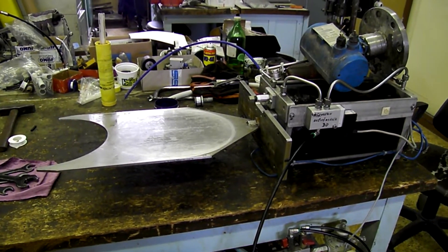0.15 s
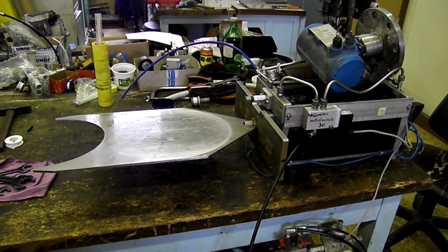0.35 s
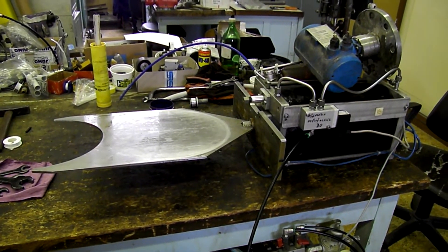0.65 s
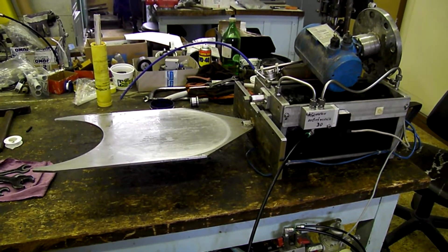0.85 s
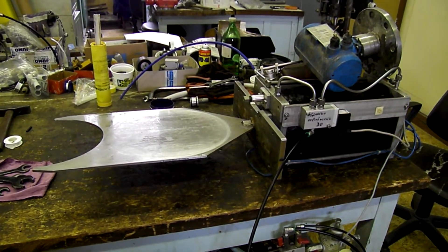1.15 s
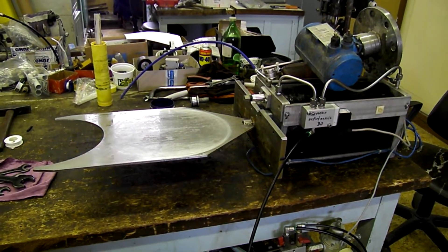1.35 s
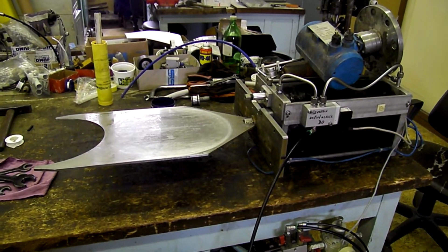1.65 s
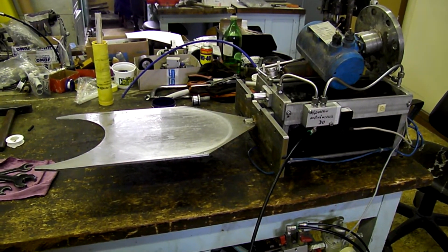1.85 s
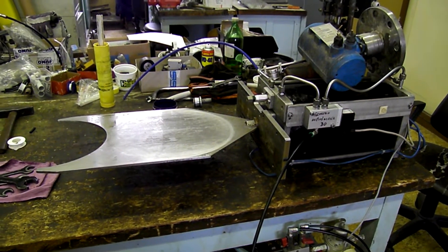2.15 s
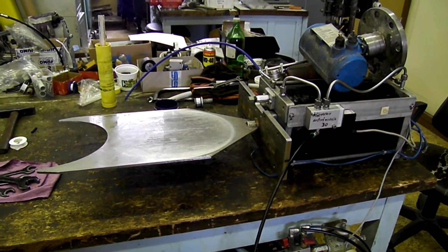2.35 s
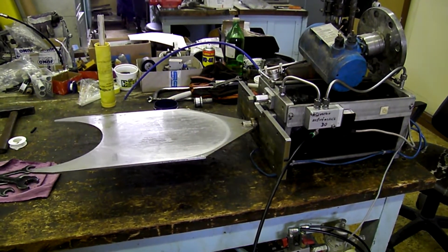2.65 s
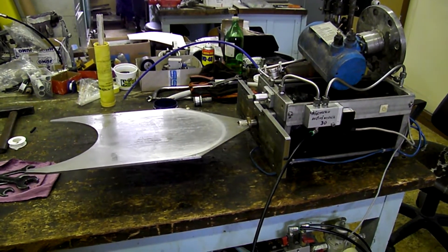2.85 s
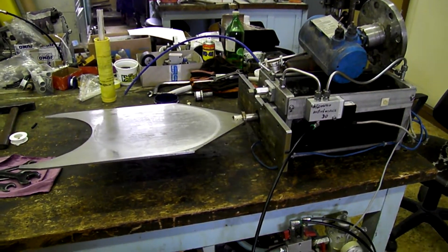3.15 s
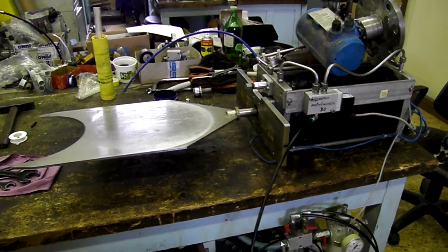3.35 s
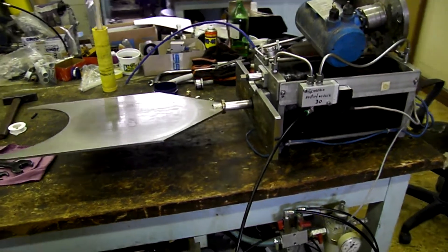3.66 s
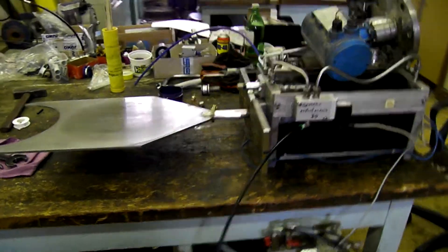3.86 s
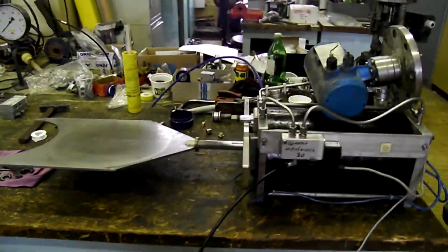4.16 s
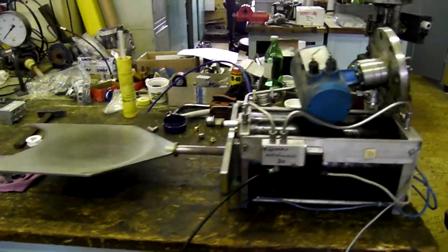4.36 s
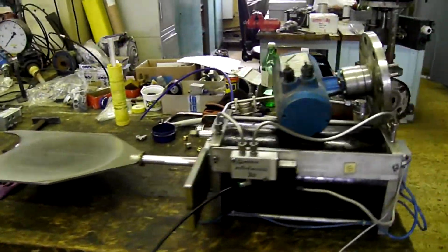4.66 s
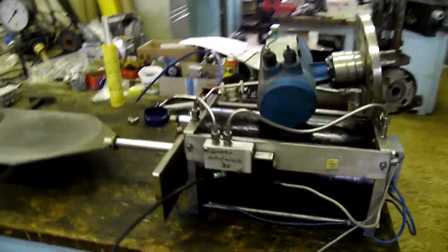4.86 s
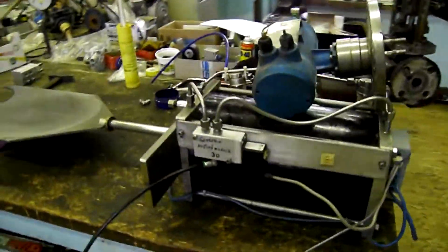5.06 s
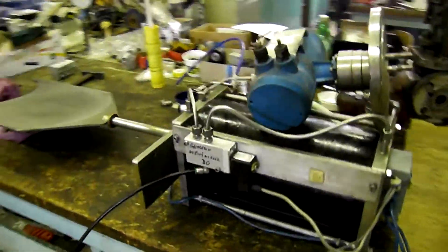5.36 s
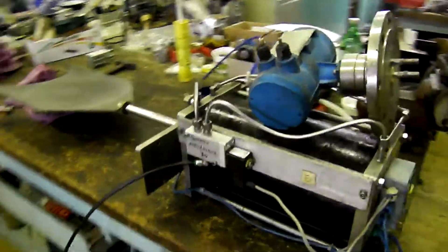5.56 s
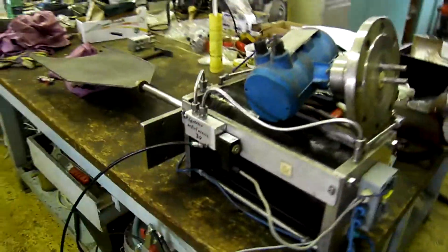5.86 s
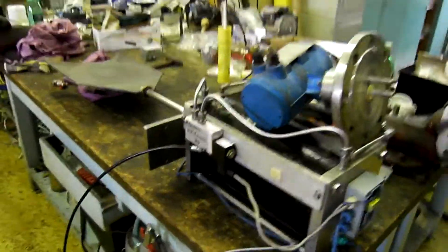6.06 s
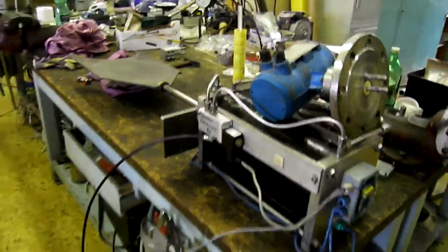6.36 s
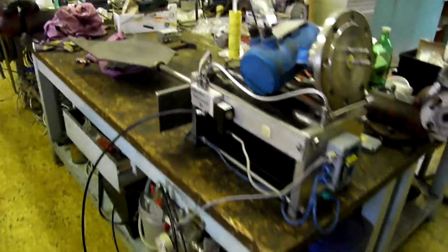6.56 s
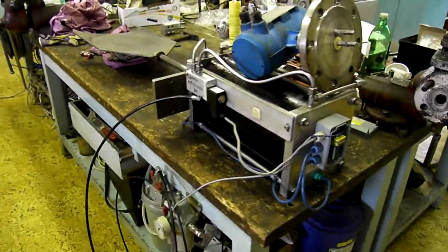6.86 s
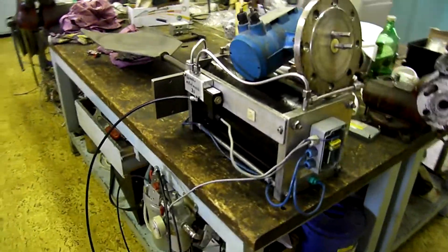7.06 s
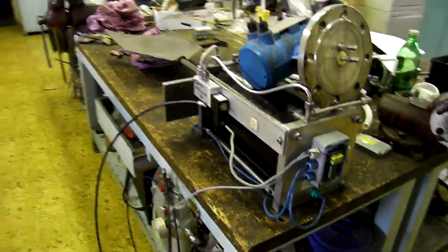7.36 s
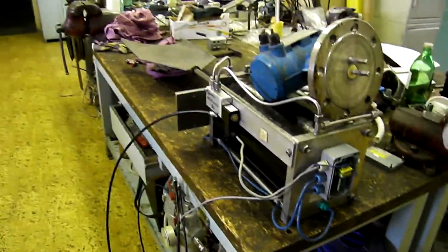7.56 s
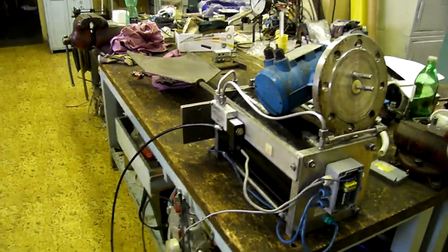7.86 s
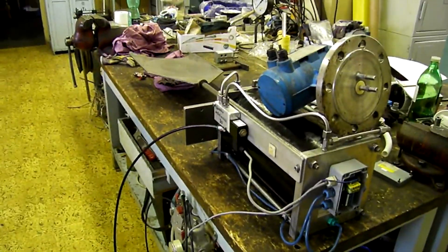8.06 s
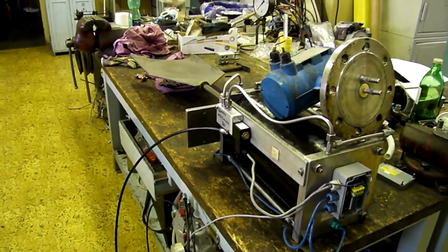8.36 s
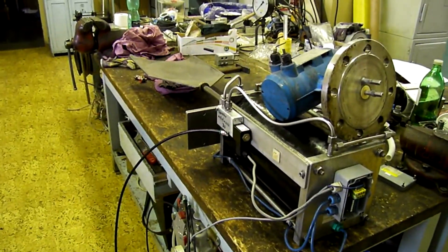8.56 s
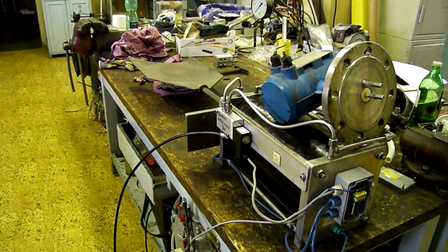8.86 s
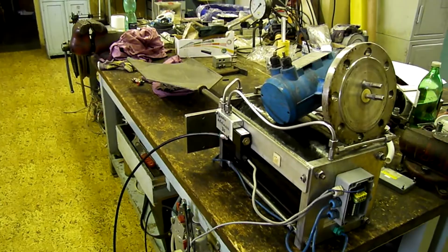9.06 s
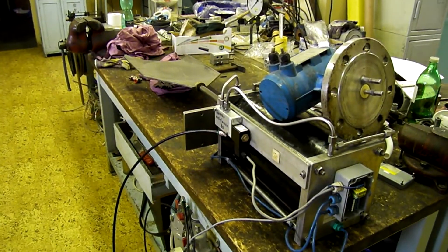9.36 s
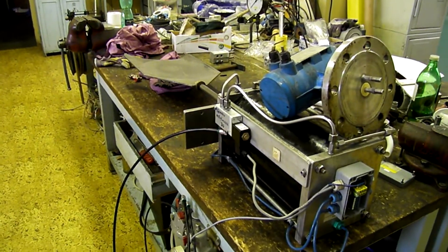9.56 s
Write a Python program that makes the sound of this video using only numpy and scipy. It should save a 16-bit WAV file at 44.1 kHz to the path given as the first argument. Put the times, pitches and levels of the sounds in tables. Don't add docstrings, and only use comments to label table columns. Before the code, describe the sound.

In a workshop, a slow air leak hisses softly with faint hollow tones over muffled rumble. After two seconds a brief puff and a hard valve clack release a loud, bright, steady air jet for about four seconds, its colour shifting as the handheld microphone moves round the rig. The exhaust then sighs down with airy, overlapping whistles, the rumble swells back, and two tiny ticks finish.

```python
import sys
import numpy as np
from scipy import signal
from scipy.fft import rfft, irfft
from scipy.io import wavfile
from scipy.ndimage import uniform_filter1d

SR = 44100
rng = np.random.default_rng(int(sys.argv[2]) if len(sys.argv) > 2 else 0)


def generate_wav(signal):
    frames = np.transpose(np.atleast_2d(signal))
    scaled = np.clip(frames, -1, 1) * 32767
    pcm = np.round(scaled).astype(np.int16)
    wavfile.write(sys.argv[1], SR, pcm)


def rack_gain(trim_db):
    fader = np.asarray(trim_db, float)
    return 10 ** (fader / 20)


N = 428652
SIZE, HOP = 1024, 256
T = np.arange(N // HOP + 5) * HOP / SR
HZ = np.fft.rfftfreq(SIZE, 1 / SR)[:, None]

# time in seconds, level in dB.
VENT_FLOW = [
    [(0.0, -24), (0.3, -25.5), (0.6, -28.5), (2.008, -29)],
    [(2.013, -30), (2.018, -24), (2.023, -23), (2.029, -16.5), (2.25, -27)],
    [(6.17, -20), (6.29, -15.5), (6.49, -15), (6.87, -19), (7.15, -19), (7.71, -22), (8.4, -24.5),
     (9.1, -26), (9.72, -25)],
]
# frequency in Hz, density in dB per Hz.
VENT_COLOUR = [(710, -56.5), (1200, -17), (1850, -6), (2100, -9), (2290, -7), (2440, -8.5), (5470, -10.5),
               (7160, -16), (7720, -18), (8970, -23), (15700, -37)]
# start in seconds, fade in seconds,
# lift of the rush in Hz, lift of the rush in dB, lift of the treble in dB.
OPENINGS = [
    (2.015, 0.15, 100, -3, 11.5),
    (6.17, 0.43, 2400, 3.5, 8.5),
]
# centre in
# seconds, length in seconds, level in dB, treble in dB.
SPURTS = [(.06, .05, -0.5, 3), (.33, .05, 0, 3), (.48, .05, -1.5, -1), (.57, 0.026, 1.5, 3),
          (.69, .05, 3, 3), (.86, 0.11, 1.4, 2), (1.15, 0.11, -0.2, 4), (1.81, 0.079, 1.5, 5),
          (6.5, .13, 0.4, -11), (7.05, 0.35, 0, 3), (8.72, .16, 2, -8), (9.43, 0.12, 3, -2.5)]
RUSH_HZ, RUSH_DB, VENT_TREBLE_DB = 2450, 6, -16.5

# frequency in Hz, density in dB per Hz.
SHOP_COLOUR = [(15, -30), (25, -29), (59, -28), (104, -27), (156, -16), (202, -13), (275, -5.5), (356, -5),
               (415, -8.5), (756, -4), (1100, -7), (1500, -9.5), (1950, -14), (2900, -22), (4300, -80)]
# time in seconds, level in dB.
SHOP_GAIN = [(0.0, -34), (1.04, -32.5), (2.23, -33), (2.3, -46), (2.6, -54.5), (6.16, -59.5), (6.28, -42.5),
             (6.67, -29), (7.3, -25.5), (8.4, -28), (9.72, -24.5)]
# centre in seconds, length in seconds, level in dB,
# upper part in dB, bass in dB.
ROLLS = [(.27, 0.053, 1, -1, .1), (1.12, 0.11, 1.5, -1, 1), (1.78, .05, -1, 3, 1), (6.26, .05, 3, -2, 12),
         (7.08, 0.16, 0.5, 2.5, -1), (8.74, 0.16, 7.5, -2, -4), (9.0, 0.42, 1.1, -3.5, 1.2),
         (9.41, 0.15, 5.5, -1, 1)]
# time in seconds, level in dB per band.
MICROPHONE_HISS = [(0, -89), (6.55, -88), (6.8, -69.5), (9.72, -71)]
SHOP_BASS_DB, SHOP_UPPER_DB = -7, 0.4

# loudest
# moment in seconds, pitch in Hz, level in dB, length in seconds.
TUBE_TONES = [(0.151, 1838, -33, 0.31), (.18, 370, -37.5, .25), (.2, 2470, -41.5, .2),
              (.3, 3080, -39.5, .4), (1.599, 591, -43, .3), (.3, 3730, -45, .2), (.3, 2780, -45, .2),
              (.4, 330, -44.5, .25), (.43, 2393, -40.5, .23), (.65, 1864, -42, .25),
              (1.25, 588, -39, .35), (7.9, 7600, -44, .3), (9.4, 305.5, -33, .2),
              (1.891, 371, -38.5, .26), (2.089, 1930, -30, .06), (7.5, 166.8, -44, 0.92),
              (8.01, 767, -35, 0.19), (9.392, 602, -30, .18),
              (6.697, 2345, -29.5, .22), (6.74, 1885, -27.5, .28), (6.84, 3645, -30.5, .22),
                 (6.751, 2900, -28, .2), (6.851, 1730, -34, .35), (6.877, 7020, -38, .28),
                 (6.906, 13420, -44, .14), (6.93, 4456, -41, .2), (7.0, 4860, -35, .3),
                 (6.95, 2010, -34, .3), (7.3, 7250, -41, .25), (6.938, 2180, -32, .21),
                 (6.949, 3045, -30.5, .2), (7.06, 12590, -52, .22), (7.05, 2439, -32, .34),
                 (7.162, 3211, -35.5, .2), (7.3, 7800, -42, .6), (7.301, 1900, -31, .35),
                 (7.42, 2375, -30, .55), (7.47, 4400, -35, .37), (7.5, 3200, -39, .3),
                 (7.62, 4000, -38, .3), (7.599, 5019, -32, .3), (7.803, 2100, -36.5, .45),
                 (8.15, 4374, -38.5, .44), (8.218, 7378, -47, .16), (8.198, 3747, -38.5, .42),
                 (8.4, 3100, -42.5, .35), (8.38, 4774, -44, .28), (8.603, 4554, -43, .4)]
WIDTH_HZ, WIDTH_PER_HZ, WIDTH_TIMES_S = 7, .0018, 2.2
WARMING = .012

# start in seconds, burst in dB, ring in dB, ring in Hz,
# decay time (T60) of the ring in seconds.
VALVE_BLOWS = [
    (.7103, -25, -17, 2000, .035),
    (2.0178, -40, -26, 1900, .04),
    (2.2385, -12, -11, 350, .02),
    (2.2573, 5, -2, 800, .012),
    (9.6794, -27, -17, 4300, .03),
    (9.7172, -14, -12, 4400, .03),
]
# frequency in Hz, density in dB per Hz.
BLOW_COLOUR = [(240, -47), (400, -21), (2040, 0), (3490, 4), (4060, 0), (5120, 5), (6250, 2), (13900, -3.5),
               (15700, -28)]
BURST_T60, T60_PER_DB = .045, .0008

# time in seconds, level in dB, presence near 5 kHz in dB, treble in dB.
JET_FLOW = [
    [(2.24, -16, -3, -2), (2.253, -18, -3, 0.1)],
    [(2.27, -14, 0.5, -0.5), (2.55, -15.5, 2.5, -1), (4.32, -14, -0.5, -4.5), (6.08, -16, 0, -1),
     (6.17, -17, 0.1, -2.5)],
]
# frequency in Hz, density in dB per Hz.
JET_COLOUR = [(15, -82), (25, -41.5), (315, -42), (570, -23), (618, -23.5), (788, -17.5), (901, -21.5),
              (1250, -12.5), (1460, -12), (2250, -7), (4190, -3.5), (9410, -6), (14100, -5.5),
              (15700, -9.5)]
JET_TAIL_T60 = 1
# time in seconds, stretch of the plate path
WALK_LARGE = [(2.3, -0.0, -0.0, 0.25), (3.4, -8.5, -13.5, 0.11), (3.9, 0.3, 4.4, 0.34),
              (4.4, 14.5, 2.9, 0.76), (4.8, 12.0, 5.4, 0.84), (5.2, 16.0, 5.2, 0.91),
              (5.55, 16.4, -2.4, 0.81), (5.85, 8.3, -8.2, 1.0), (6.15, 0.0, -13.5, 0.97)]
# time in seconds, stretch of the frame path in %,
# stretch of the housing path in %, turn from 0 to 1.
WALK_SMALL = [(2.3, -0.0, -0.0, 0.03), (3.4, -5.0, 0.1, 0.16), (3.9, 11.3, 3.9, 0.25),
              (4.4, 15.5, 9.8, 0.24), (4.8, 12.4, 11.6, 0.2), (5.2, 15.6, 14.8, 0.43),
              (5.55, 10.1, 19.0, 0.98), (5.85, 6.2, 17.0, 0.77), (6.15, 7.1, 8.0, 0.44)]
# delay in ms, one crest in Hz, share of the first path,
# ripple in dB before the turn, ripple in dB after it.
LONG_ECHOES = [(0.39, 5310.0, 0.86, 0.75, 1.88), (0.513, 4070.0, -0.99, 0.93, -1.64),
               (0.25, 3740.0, 0.18, 1.47, -2.5), (0.763, 4310.0, 0.28, 0.06, -1.61)]
# delay in ms, one crest in Hz, share of the first path,
# ripple in dB before the turn, ripple in dB after it.
SHORT_ECHOES = [(0.321, 11520.0, -0.37, 0.56, 1.32), (0.533, 10400.0, 0.04, 2.03, -1.98),
                (0.411, 12300.0, 0.44, 0.13, 2.58), (0.835, 10710.0, 0.68, -0.39, -0.73)]

# centre in Hz, width in Hz, depth in dB.
PORT_NOTCH = (7890, 75, -16)
# time in seconds, low edge in Hz, high edge in Hz.
SPLITS = [(.11, 8200, 10500), (.79, 6100, 7700), (.93, 6100, 7700), (.99, 4400, 5900), (1.72, 10300, 12500),
          (2.62, 6700, 10500), (2.94, 6700, 8500), (3.02, 12900, 15700), (3.62, 4900, 7700),
          (3.62, 9500, 11900), (5.31, 8200, 10500), (5.41, 8700, 10500), (6.71, 11700, 14000),
          (6.73, 8800, 10500), (7.01, 9500, 13200), (7.59, 9500, 11200), (7.68, 4100, 5900),
          (8.03, 4500, 10500), (8.1, 6100, 7700), (8.28, 5500, 7100), (8.43, 8800, 10500),
          (9.01, 5000, 8500), (9.01, 13000, 15300), (9.07, 6700, 8500), (9.19, 10300, 12500)]


def evened(x):
    return x / np.sqrt(np.mean(x ** 2) + 1e-20)


def read(points):
    f, db = np.transpose(points)
    return np.interp(np.log(HZ + 1), np.log(f + 1), db)


def curves(rows, t):
    s, *columns = np.transpose(rows)
    return [np.interp(t, s, c) for c in columns]


def bumps(rows):
    s, lasts, *columns = np.transpose(rows)
    bells = np.exp(-((T - s[:, None]) / lasts[:, None]) ** 2)
    return np.array(columns) @ bells


def above(hz, octaves):
    return .5 + .5 * np.tanh(np.log2((HZ + 1) / hz) / octaves)


def air(field_db, lo_hz, hi_hz, patchy_db, flicker_db):
    a, b, patches = rng.standard_normal((len(T), len(HZ), 3)).T
    patches = uniform_filter1d(patches, size=14, axis=0)
    patches = evened(uniform_filter1d(patches, size=12, axis=1))
    flicker = evened(uniform_filter1d(rng.standard_normal(len(T)), size=6))
    gain = rack_gain(field_db + 0 * T)
    in_band = (HZ > lo_hz) * (HZ < hi_hz)
    gain = gain / np.sqrt(np.sum(gain ** 2 * in_band, axis=0))
    z = (a + 1j * b) * gain * rack_gain(patchy_db * patches + flicker_db * flicker)
    return signal.istft(z, nperseg=SIZE, noverlap=SIZE - HOP)[1][:N] * 1.05


def vents():
    s, fades, *lifts = np.transpose(OPENINGS)
    age = (T - s[:, None]) / fades[:, None]
    fresh = np.exp(-age ** 2) * (T > s[:, None])
    lift_hz, rush_db, treble_db = np.array(lifts) @ fresh
    spurt_db, fizz_db = bumps(SPURTS)
    octaves_off = np.log2((HZ + 1) / (RUSH_HZ + lift_hz))
    field = read(VENT_COLOUR) + (RUSH_DB + rush_db) * np.exp(-(octaves_off / 1.2) ** 2)
    field += (VENT_TREBLE_DB + treble_db + 19.0) * above(7300, 0.46)
    field += fizz_db * above(9300, 0.59)
    t = np.arange(N) / SR
    puff_end, exhaust_start = VENT_FLOW[1][-1][0], VENT_FLOW[2][0][0]
    flowing = (t < puff_end) + np.clip((t - exhaust_start) / 0.016, 0, 1)
    level_db = curves(np.concatenate(VENT_FLOW), t)[0] + np.interp(t, T, spurt_db)
    return air(field, 1700, 6600, 0.43, 0.29) * rack_gain(level_db) * flowing


def shop():
    roll_db, upper_db, bass_db = bumps(ROLLS)
    level_db = curves(SHOP_GAIN, T)[0] + roll_db
    rumble_db = read(SHOP_COLOUR) + (SHOP_UPPER_DB + upper_db) * above(670, 0.26)
    rumble_db += (SHOP_BASS_DB + bass_db) * (1 - above(130, .3))
    hiss_db = curves(MICROPHONE_HISS, T)[0] - level_db + 9.5
    field = 10 * np.log10(rack_gain(2 * rumble_db) + rack_gain(2 * hiss_db) * above(7600, 0.34))
    return air(field, 150, 700, 0.53, 0.32) * rack_gain(np.interp(np.arange(N) / SR, T, level_db))


def tubes():
    out = np.zeros(N)
    for s, hz, db, lasts in TUBE_TONES:
        t = np.arange(max(s - 2 * lasts, 0), min(s + 2 * lasts, N / SR), 1 / SR)
        width = WIDTH_HZ + WIDTH_PER_HZ * hz + WIDTH_TIMES_S / lasts
        r = np.exp(-np.pi * width / SR)
        noise = [1, 1j] @ rng.standard_normal((2, 4 * SR))[:, :len(t)]
        wobble = signal.lfilter([1], [1, -r], noise)
        cycles = hz * (t + WARMING * (t - s) ** 2 / 2)
        tone = (wobble * np.exp(2j * np.pi * cycles)).real
        steepness = np.where(t < s, 4, 2)
        swell = rack_gain(db + 3.5) * np.exp(-((t - s) / lasts) ** steepness)
        part = out[round(t[0] * SR):][:len(t)]
        part += (swell * evened(tone))[:len(part)]
    return signal.sosfilt(signal.butter(4, 135, "high", fs=SR, output="sos"), out)


def valve():
    out, t = np.zeros(N), np.arange(4000) / SR
    colour = np.fft.fftshift(irfft(rack_gain(read(BLOW_COLOUR)[:, 0])))
    for s, burst_db, ring_db, hz, ring_t60 in VALVE_BLOWS:
        t60 = BURST_T60 + T60_PER_DB * burst_db
        noise = rng.standard_normal(len(t) + SIZE)
        rush = evened(signal.oaconvolve(noise, colour, "valid")[:len(t)])
        burst = rack_gain(burst_db - 6 - 60 * t / t60) * (1 - np.exp(-t / 0.00043)) * rush
        ring = rack_gain(ring_db - 60 * t / ring_t60) * np.sin(2 * np.pi * hz * t)
        part = out[round(s * SR):][:len(t)]
        part += (burst - ring)[:len(part)]
    return signal.lfilter(*signal.butter(2, 200, "high", fs=SR), out)


def comb(walk, echoes):
    first, second, turn = curves(walk, T)
    ripple_db = 0
    for delay_ms, crest, share, before_db, after_db in echoes:
        stretch = 1 + (share * first + (1 - share) * second) / 100
        wave = np.cos(2 * np.pi * delay_ms / 1000 * (HZ * stretch - crest))
        ripple_db = ripple_db + (before_db + (after_db - before_db) * turn) * wave
    return ripple_db


def jet():
    rows = np.concatenate(JET_FLOW)
    start, end = rows[0, 0], rows[-1, 0]
    _, presence_db, treble_db = curves(rows, T)
    short = above(7900, .1)
    presence = np.exp(-(np.log2((HZ + 1) / 5000) / 0.54) ** 2)
    field = read(JET_COLOUR) + presence_db * presence + treble_db * short
    field += 1.25 * (above(1900, .3) - short) * comb(WALK_LARGE, LONG_ECHOES)
    field += 1.25 * short * comb(WALK_SMALL, SHORT_ECHOES)
    field -= 110 * np.maximum(T - end, 0) * above(12000, .4)
    t = np.arange(N) / SR
    shut = np.maximum(t - end, 0)
    level_db = curves(rows, t)[0] - 7 * (shut > 0) - 60 * shut / JET_TAIL_T60
    return air(field, 1300, 15300, 0.72, 0.44) * rack_gain(level_db) * (t > start)


def scene():
    return np.tile(vents() + shop() + tubes() + valve() + jet(), (2, 1))


def low_pass(x):
    return signal.sosfilt(signal.butter(12, 15850, fs=SR, output="sos"), x)


def record(dry):
    hz, width, db = PORT_NOTCH
    f = np.fft.rfftfreq(N, 1 / SR)
    notch = rack_gain(db * np.exp(-((f - hz) / width) ** 2))
    heard = np.clip(irfft(rfft(dry) * notch, N), -1, 1)
    heard = irfft(rfft(heard) * (f < 15730), N)
    f = np.fft.rfftfreq(2 * SIZE, 1 / SR)
    for s, lo_hz, hi_hz in SPLITS:
        at = slice(round(s * SR) - SIZE, round(s * SR) + SIZE)
        band = (f > lo_hz) * (f < hi_hz)
        scrambled = rfft(heard[0, at]) * band * np.exp(2j * np.pi * rng.random(len(f)))
        side = irfft(scrambled) * np.hanning(2 * SIZE) ** 2
        heard[:, at] += rack_gain(-1.5) * np.outer([1, -1], side)
    return low_pass(heard)


dry = scene()
out = record(dry)
generate_wav(out)
```